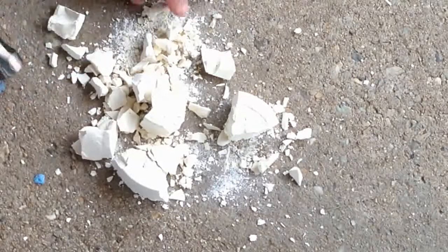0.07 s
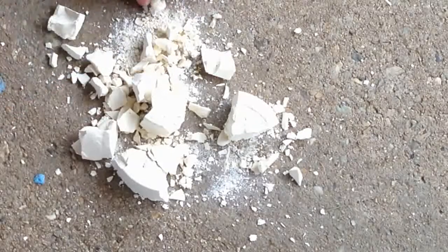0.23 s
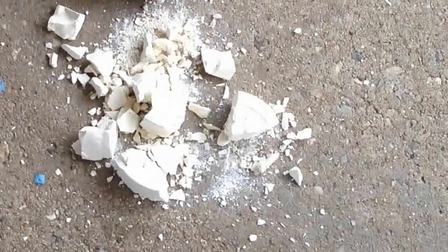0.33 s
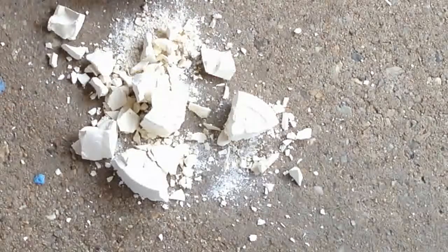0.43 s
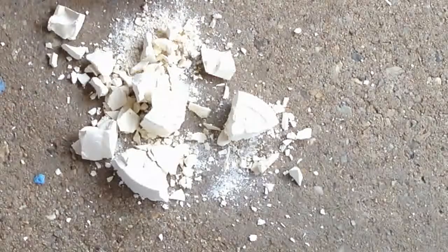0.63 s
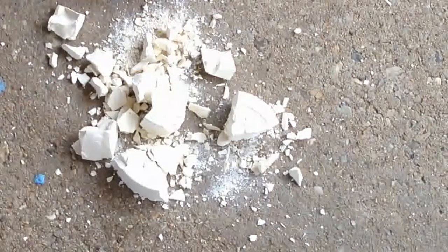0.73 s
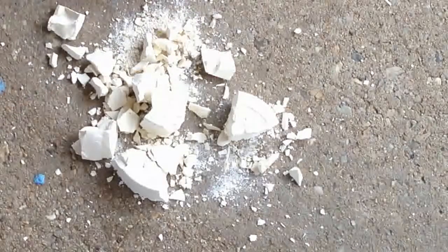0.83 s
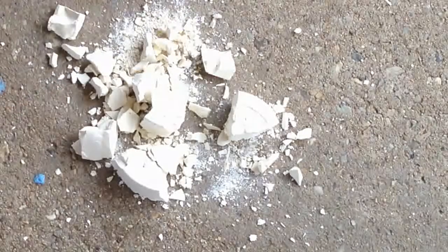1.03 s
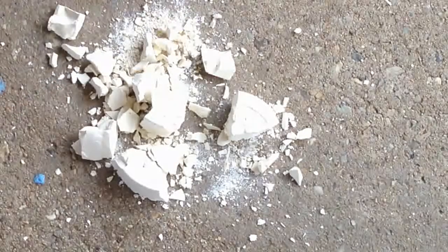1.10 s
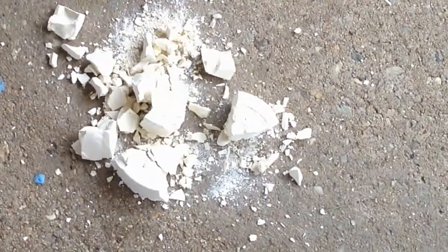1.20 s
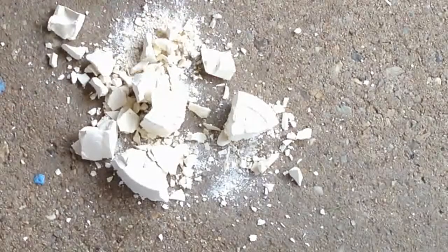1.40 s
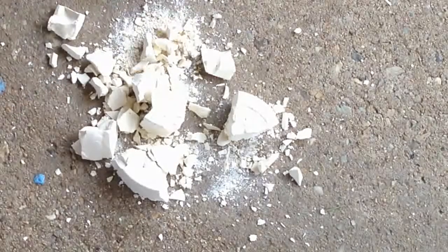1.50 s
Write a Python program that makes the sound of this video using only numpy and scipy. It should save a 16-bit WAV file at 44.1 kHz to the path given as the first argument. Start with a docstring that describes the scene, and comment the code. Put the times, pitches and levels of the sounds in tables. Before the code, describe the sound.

Quick metallic knocks and clinks of a small hammer set down on concrete.

```python
"""In a small workshop, a small hammer is let down on a concrete floor among plaster pieces.
It touches, rocks and clatters, the last blow hardest. Each impact gives a dull knock, a stony crack
and the ring of the hammer's modes, coloured by where it lands. Plaster crumbs tick;
the room answers with echoes and reverberation, over a low rumble, a weak drone and a faint hiss."""
import sys
import numpy as np
from scipy import signal
from scipy.fft import rfft, irfft, next_fast_len
from scipy.io import wavfile
from scipy.ndimage import map_coordinates

SR = 44100
rng = np.random.default_rng(int(sys.argv[2]) if len(sys.argv) > 2 else 0)


def persist_wave(psi):
    """Save psi, clipped to +-1, as 16-bit WAV."""
    counts = np.round(np.clip(psi, -1, 1) * 32767).astype(np.int16)
    wavfile.write(sys.argv[1], SR, np.atleast_2d(counts).T)


N = 68355
t = np.arange(SR * 3 // 5) / SR  # time axis of one event, in seconds


def hammer():
    """Impact excitation: each contact radiates noise bursts and rings the modes of steel and plaster."""
    # start_s, knock_db, plaster_db, crack_db, crack_low_hz, crack_high_hz, splinter_db, five ring_db
    contacts = [ (0.0869, -3, -58, -26.5, 4580, 9000, -32.5, -46, -56, -59, -53, -61.5),
                (0.1862, -15, -46.5, -8, 4800, 7300, -31, -43.5, -60, -42.5, -42, -45),
                (0.2195, -14, -76, -9.5, 1000, 2350, -45.5, -47.5, -58, -63, -56, -68),
                (0.2268, 1.5, -26.5, -4, 2230, 5090, -32, -18.5, -19, -41.5, -57, -46.5),
                (0.2501, 3, -49, 6.5, 1100, 3260, -40, -36, -35, -29.5, -43.5, -55),
                (0.2857, -10.5, -40, 1, 3050, 6120, -22, -38.5, -24.5, -28, -47, -46),
                (0.3689, -2, -27, -2, 1670, 4530, -16, -17.5, -9, -24, -34.5, -24), ]
    # where on the spectrum each ring_db applies: frequency_hz
    ring_hz = [1600, 2900, 4400, 6300, 7900]
    # natural frequencies of the hammer: pitch_hz
    steel_hz = [1548, 1598, 2770, 2920, 3085, 4376, 6085, 6653, 7918]
    # strength and decay of those modes: level_db, t60_s
    steel_modes = [(-1.5, 0.034), (-3.5, 0.094), (-2.5, 0.0088), (2, 0.016), (-18, 0.0363), (1, 0.035),
                   (-1, 0.049), (-12, 0.21), (0.5, 0.035)]
    # hollow part of the knock: pitch_hz, level_db, t60_s
    hollow_modes = [(160.8, -44, 0.15), (188, -35, 0.054), (230.8, -37.5, 0.058), (543.3, -49.5, 0.21)]
    # clink of the plaster pieces: pitch_hz, level_db, t60_s
    plaster_modes = [(1376, -19, 0.09), (1885, 4, 0.021), (1974, -1.5, 0.026), (2185, -14, 0.098),
                     (2363, -15, 0.11), (2614, -7.5, 0.06), (3070, -18.5, 0.045), (3290, -15.5, 0.09),
                     (4680, -7, 0.022), (4990, -4, 0.016)]
    out = np.zeros(N)
    for start_s, knock_db, plaster_db, crack_db, low_hz, high_hz, splinter_db, *ring_db in contacts:
        thud = band(burst(t60_s=0.032, grit=0.99), low_hz=432, high_hz=1240)
        knock = amp(knock_db) * (thud + ring(hollow_modes))
        crack = amp(crack_db) * band(burst(t60_s=0.02, grit=1), low_hz, high_hz)
        splinter = amp(splinter_db) * band(burst(t60_s=0.016, grit=1.1), low_hz=8500, high_hz=11450)
        clink = amp(plaster_db) * ring(plaster_modes)
        colour = list(zip(ring_hz, ring_db))  # the point of contact weights the modes
        struck = [(hz, db + along(colour, hz), t60_s) for hz, (db, t60_s) in zip(steel_hz, steel_modes)]
        steel = ring(struck, rise_cycles=1.76)
        add(out, start_s, workshop(knock + crack + splinter + clink + steel))
    return out


def burst(t60_s, grit):
    """Broadband transient: an impulse followed by exponentially decaying noise, of unit energy."""
    x = rng.standard_normal(len(t)) * amp(-60 * t / t60_s)
    x *= grit / np.linalg.norm(x)
    x[0] = -1
    return x / np.linalg.norm(x)


def ring(modes, rise_cycles=1, scatter_db=1.5):
    """Modal superposition: damped sines build up and decay, their levels varying from blow to blow."""
    out = np.zeros(len(t))
    for hz, db, t60_s in modes:
        decay = amp(db + scatter_db * rng.normal() - 60 * t / t60_s)
        attack = 1 - np.exp(-t * hz / rise_cycles)
        out += decay * attack * np.sin(2 * np.pi * hz * t)
    return out


def crumbs():
    """Heavily damped impacts: bits of plaster tick without ringing."""
    # ticks of plaster: start_s, level_db, low_hz, high_hz
    ticks = [(.3072, -26, 3500, 6266), (0.3231, -10.5, 1500, 6260), (0.4656, -12.5, 1530, 3280),
             (0.9863, -24, 1800, 3960)]
    out = np.zeros(N)
    for start_s, db, low_hz, high_hz in ticks:
        tick = amp(db) * band(burst(t60_s=0.016, grit=1.75), low_hz, high_hz)
        add(out, start_s, workshop(tick))
    return out


def workshop(x):
    """Convolution with a room impulse response: direct sound, early reflections and a diffuse tail."""
    # reverberation time: frequency_hz, t60_s
    room_t60 = [(150, 0.36), (600, 0.22), (1600, .45), (3000, 0.32), (5000, 0.39), (8000, 0.47),
                (12000, 0.21)]
    # colour of the tail: frequency_hz, gain_db
    room_colour = [(150, -4.5), (550, 5), (1000, -1.5), (1600, 1), (2200, -2), (2900, -2), (4400, -2.5),
                   (6600, -6), (8000, -14), (12000, -3.5)]
    # early reflections, from the ceiling: delay_s, gain_db
    echoes = [(0.0191, -17), (0.0206, -21.5)]
    tail_db, build_s = -7, 0.0055
    hz, frame_s, spectra = signal.stft(rng.standard_normal(len(t)), SR, nperseg=256)
    fade = amp(-60 * frame_s / along(room_t60, hz)[:, None])
    tail = signal.istft(spectra * fade, SR, nperseg=256)[1][:len(t)]
    tail *= 1 - np.exp(-(t / build_s) ** 2)
    response = amp(tail_db) * filtered(tail / np.linalg.norm(tail), lambda f: amp(along(room_colour, f)))
    response[0] += 1  # direct sound
    for delay_s, db in echoes:
        add(response, delay_s, amp([db]))
    return signal.fftconvolve(x, response)


def bumps(peak_s=0.0097):
    """Tone pulses: a low sine that swells and dies within a few cycles is heard as a soft bump."""
    # bumps in the room: start_s, level_db, pitch_hz
    pulses = [(0.05, -51, 85), (0.6, -52.5, 99), (.742, -49.5, 96), (0.799, -60.5, 118), (0.839, -55.5, 89),
              (1.053, -51.5, 91.8)]
    swell = (t / peak_s * np.exp(1 - t / peak_s)) ** 2
    out = np.zeros(N)
    for start_s, db, hz in pulses:
        add(out, start_s, amp(db) * swell * np.sin(2 * np.pi * hz * t))
    return out


def background(hiss_db=-65.5, rumble_db=-66, swing_db=-3.5, swing_hz=9.59):
    """Amplitude modulation: a low rumble wavers at random beneath a steady hiss."""
    # spectral density of the hiss: frequency_hz, relative_db
    hiss_spectrum = [(180, -12.5), (300, -1.5), (457, -1), (543, -3), (686, -4.5), (1500, -9), (2280, -6),
                     (11200, -12), (12500, -16), (16200, -28.5), (22000, -120)]
    # spectral density of the rumble: frequency_hz, relative_db
    rumble_spectrum = [(15, -33), (25, -12), (75, 1.5), (103, 4.5), (124, 0.5), (144, -6), (170, -1.5),
                       (199, -8), (400, -15.5), (520, -61), (880, -120)]
    knots = np.arange(N) * swing_hz / SR
    swing = map_coordinates(rng.standard_normal(N // 100), [knots])  # smooth random curve
    hiss = amp(hiss_db) * noise(hiss_spectrum)
    rumble = amp(rumble_db + swing_db * swing) * noise(rumble_spectrum)
    return hiss + rumble


def drone():
    """Narrow-band noise has a vague pitch: a weak low drone that swells briefly near the end."""
    # spectral density of the drone: frequency_hz, relative_db
    spectrum = [(120, -37.5), (152, -2), (167, -3.5), (182, -14.5), (260, -15.5), (340, -45)]
    # its envelope: time_s, level_db
    envelope = [(0, -69), (1.25, -76.5), (1.34, -63.5), (1.55, -77)]
    level_db = np.interp(np.arange(N) / SR, *np.transpose(envelope))
    return amp(level_db) * noise(spectrum)


def noise(spectrum):
    """Spectral shaping: white noise is coloured, then scaled to unit rms."""
    x = filtered(rng.standard_normal(N), lambda hz: amp(along(spectrum, hz)))
    return x / x.std()


def band(x, low_hz, high_hz):
    """Causal Butterworth band-pass, steeper at the top."""
    x = signal.sosfilt(signal.butter(2, low_hz, 'high', fs=SR, output='sos'), x)
    return signal.sosfilt(signal.butter(7, high_hz, fs=SR, output='sos'), x)


def filtered(x, gain):
    """Zero-phase filtering: the spectrum of x is multiplied by gain(hz)."""
    size = next_fast_len(len(x) + 8192)
    return irfft(rfft(x, size) * gain(np.fft.rfftfreq(size, 1 / SR)), size)[:len(x)]


def along(points, hz):
    """Interpolation of (frequency_hz, value) points on a logarithmic frequency axis."""
    point_hz, values = np.transpose(points)
    return np.interp(np.log(hz + 1), np.log(point_hz + 1), values)


def amp(db):
    """Decibels to amplitude ratio."""
    return 10 ** (np.asarray(db) / 20)


def add(track, start_s, sound):
    """Superposition: a delayed sound is summed into the track."""
    part = track[round(start_s * SR):][:len(sound)]
    part += sound[:len(part)]


def scene():
    """Sound pressures add linearly: all sources in one channel."""
    return (hammer() + crumbs() + bumps() + background() + drone())[None]


def record(dry, top_hz=12780):
    """Band limiting: an ideal low-pass removes everything above top_hz."""
    return np.array([filtered(x, lambda hz: hz < top_hz) for x in dry])


dry = scene()
out = record(dry)
persist_wave(out)
```